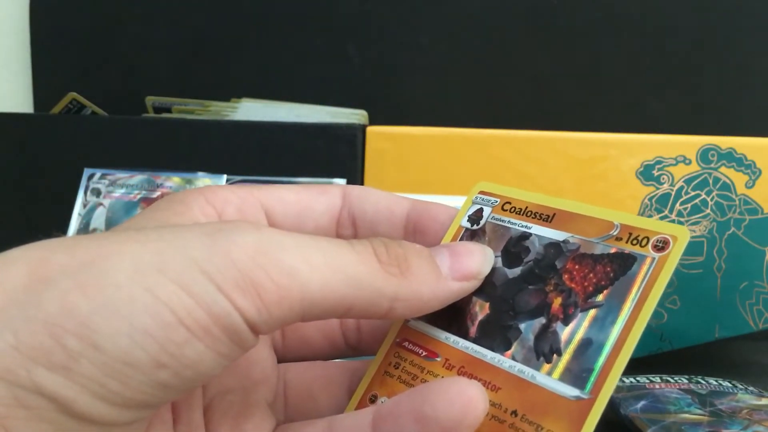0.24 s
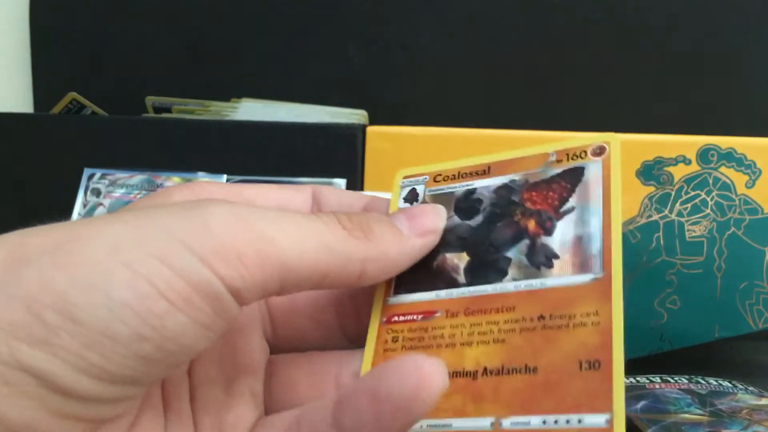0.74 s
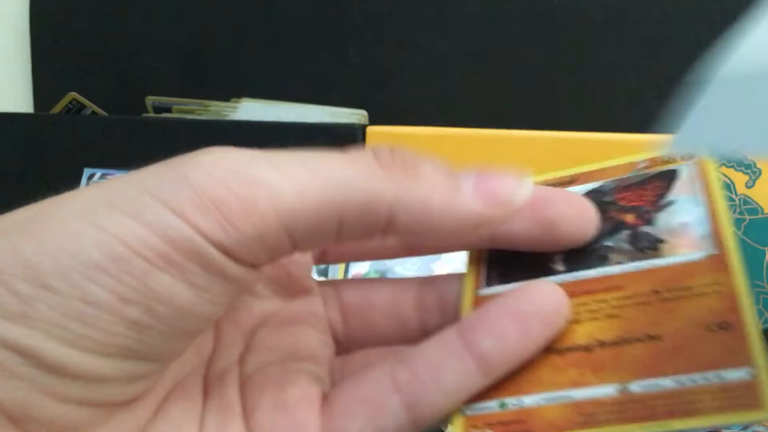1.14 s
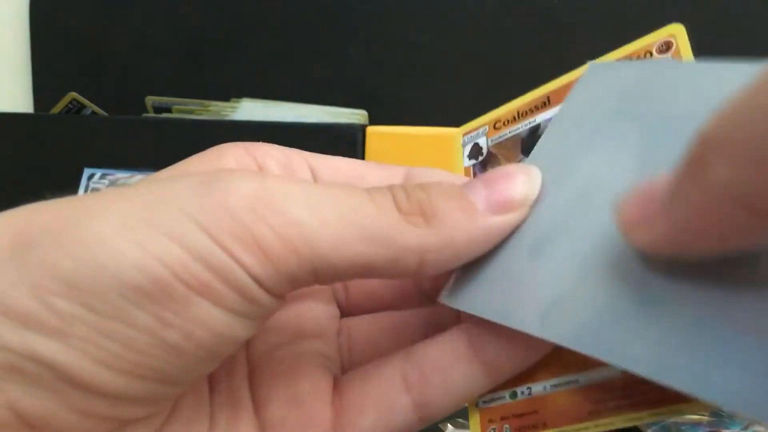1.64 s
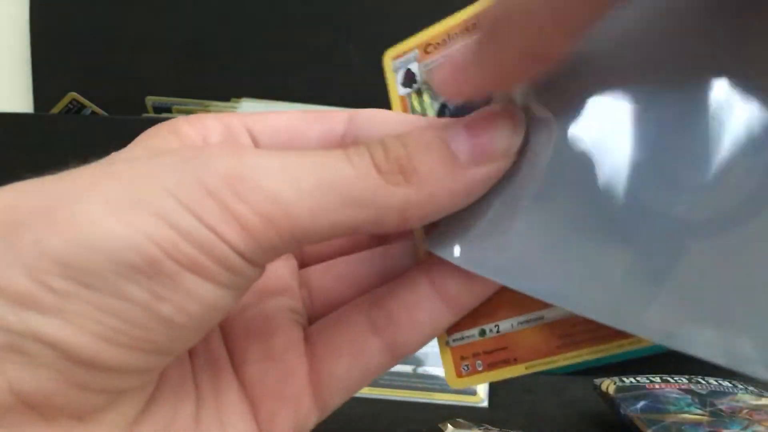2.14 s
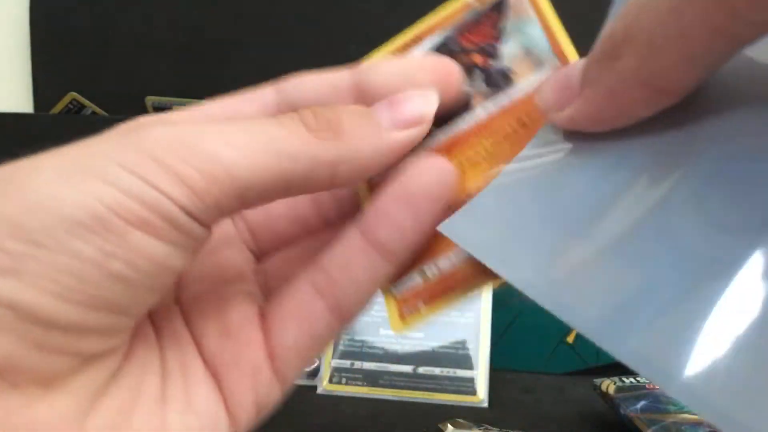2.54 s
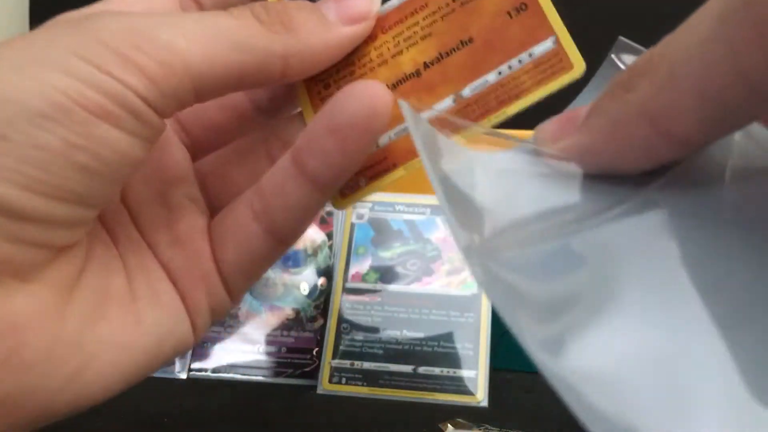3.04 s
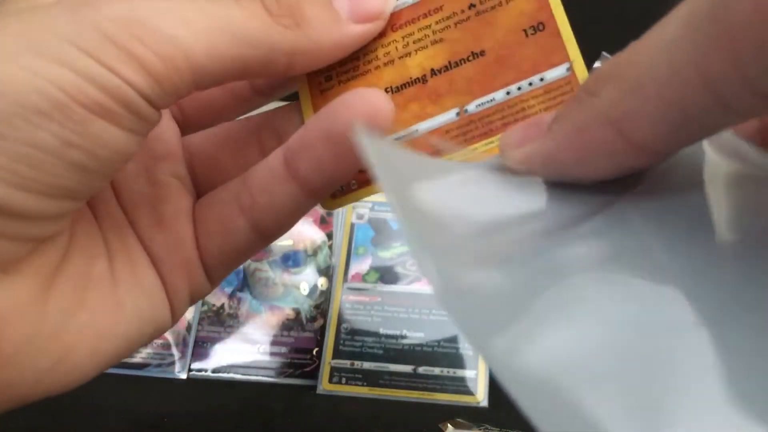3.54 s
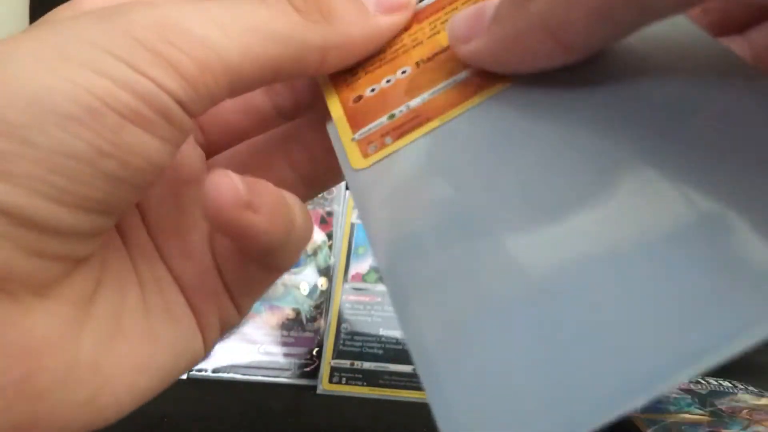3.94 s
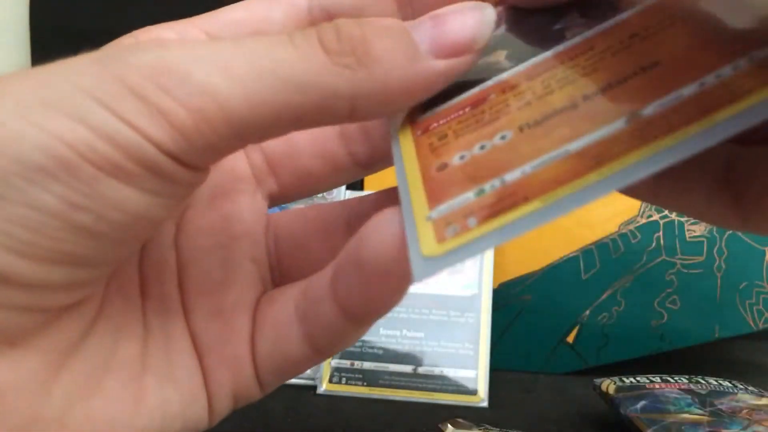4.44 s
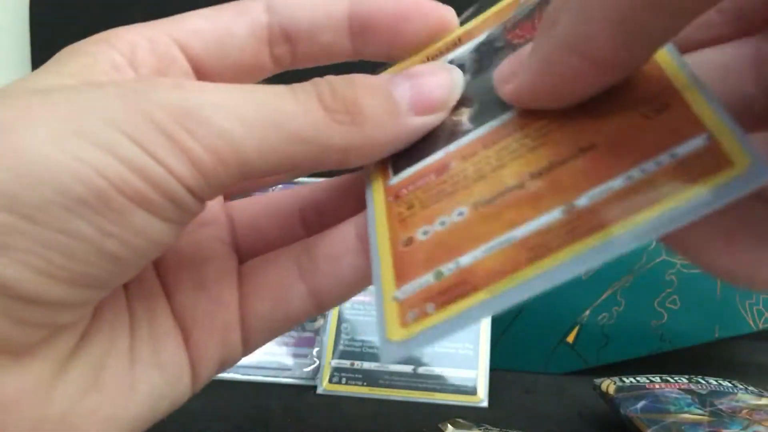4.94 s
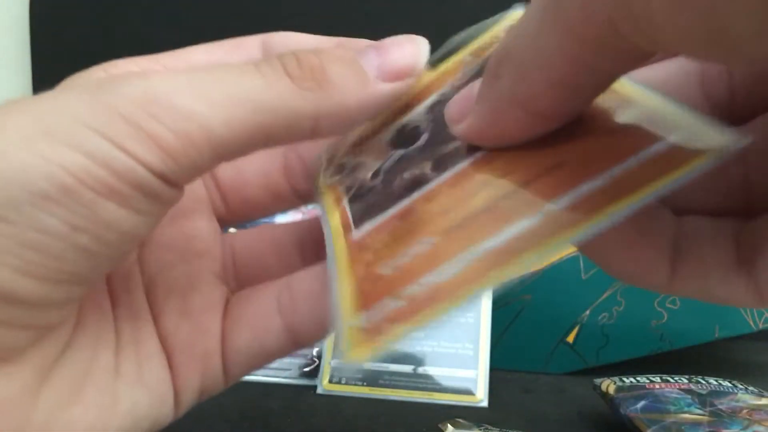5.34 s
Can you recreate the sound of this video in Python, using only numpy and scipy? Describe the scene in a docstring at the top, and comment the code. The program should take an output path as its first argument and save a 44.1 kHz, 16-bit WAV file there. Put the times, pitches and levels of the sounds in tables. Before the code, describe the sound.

Very close mono pickup in a quiet room: fingers rub a stiff card with quick dry rasps and clicks, then thin plastic film ticks and rustles. Two loud sharp snaps come just after two seconds, lighter crackles follow, the card hisses into the sleeve around four seconds, and scattered bright clicks end it. Low table rumble and faint hiss lie beneath.

```python
"""Close by, hands turn a card, open a plastic sleeve and slide the card in, above a table in a quiet room.
Early on, skin, card and film rub (friction noise into resonances), a fingertip whistles faintly on the gloss,
the buckling film snaps (noise bursts around sharp clicks), with card knocks and low thumps (decaying tones).
The sharpest snaps come a little past two seconds; near four the card hisses into the sleeve, then more snaps.
Throughout, the table hums low under the forearms (a wavering low mode) over a faint steady hiss."""
import sys
import numpy as np
from scipy import signal
from scipy.fft import rfft, irfft
from scipy.io import wavfile

SR = 44100
rng = np.random.default_rng(int(sys.argv[2]) if len(sys.argv) > 2 else 0)


def transcribe(u):
    """Save the signal u as a 16-bit wav file named by the first command-line argument.

    u: samples, shape (n,) or (channels, n), limited to [-1, 1]; the rate is SR.
    q: integer samples, one column per channel.
    """
    v = np.clip(np.atleast_2d(u).T, -1, 1)
    q = np.round(v * 32767).astype(np.int16)
    wavfile.write(sys.argv[1], SR, q)


N = 246519  # samples


def undb(db):
    """Decibel definition: level to amplitude ratio."""
    return 10 ** (np.asarray(db) / 20)


def unit(x):
    """Normalization to an RMS of 1."""
    return x / np.sqrt(np.mean(x ** 2))


def peak(x):
    """Normalization to a peak of 1."""
    return x / np.max(np.abs(x))


def band(x, hz, width_hz):
    """Simple resonance: two poles, gain 1 at the centre."""
    hz = np.clip(hz, 20, 18000)
    b, a = signal.iirpeak(hz, hz / np.clip(width_hz, 1, 18000), SR)
    return signal.lfilter(b, a, x)


def ring(x, modes):
    """Modal superposition: parallel resonances, neighbours opposite in sign."""
    return sum((-1) ** k * undb(db) * band(x, hz, width) for k, (hz, width, db) in enumerate(modes))


def curves(table):
    """Linear interpolation of each column over time."""
    s, *columns = np.transpose(table)
    return [np.interp(np.arange(N) / SR, s, c) for c in columns]


def walk(rate):
    """Slow random modulation: levels, rate a second, joined by straight lines; spread near 1."""
    levels = rng.standard_normal(1200)
    return 1.2 * np.interp(np.arange(N) * rate / SR, np.arange(len(levels)), levels)


def friction(scatter_db, patch_rate, patchy_db):
    """Stick-slip friction: dense slips of uneven size, stronger and weaker in patches."""
    slips = rng.standard_normal(N) * undb(scatter_db * rng.exponential(size=N))
    return slips * undb(patchy_db * walk(patch_rate))


def rasp(modes, scatter_db, drift_db, patchy_db=3.1):
    """Friction-driven modes: the contact wanders, so each mode swells and fades alone."""
    slips = friction(scatter_db, 80, patchy_db)
    total = np.zeros(N)
    for k, (hz, width, db) in enumerate(modes):
        tone = band(band(slips, hz, width), hz, 5.16 * width)
        total += (-1) ** k * undb(db + drift_db * walk(14)) * tone
    return unit(total)


# time constants of every stroke, and the level it gains as pressure builds
ATTACK_S, RELEASE_S, BUILD_DB_PER_S = 0.0053, 0.0074, 8


def stroke(s, length):
    """Exponential envelope: rises to 1 at the start, builds over the length and dies away."""
    knee_db = [-60, 0, BUILD_DB_PER_S * length, -60]
    # 60 dB take ln(1000) time constants
    knee_s = s + np.array([-np.log(1000) * ATTACK_S, 0, length, length + np.log(1000) * RELEASE_S])
    i, j = np.clip(knee_s[[0, -1]] * SR, 0, N).astype(int)
    gain = np.zeros(N)
    gain[i:j] = undb(np.interp(np.arange(i, j) / SR, knee_s, knee_db))
    return gain


def swells(table, resting_db):
    """Gaussian envelopes: smooth humps on top of a resting level."""
    t = np.arange(N) / SR
    humps = sum(undb(db) * np.exp(-(2 * (t - s) / length) ** 2) for s, length, db in table)
    return undb(resting_db) + humps


# spectrum of the room hiss before levelling: pitch_hz, density (dB per Hz, relative)
ROOM_SPECTRUM = [(150, -38), (250, 21), (500, 1), (684, 11.5), (1040, -15), (2080, -16), (6410, -12),
                 (15800, -2)]
ROOM_DB = -75  # RMS


def room():
    """Stationary noise: the steady faint hiss of room and microphone, shaped in frequency."""
    hz, db = np.transpose(ROOM_SPECTRUM)
    log_hz = np.log(np.arange(1, N // 2 + 2) * SR / N)
    spectrum = rfft(rng.standard_normal(N)) * undb(np.interp(log_hz, np.log(hz), db))
    return undb(ROOM_DB) * unit(irfft(spectrum, N))


# forearms lean on the table: centre_s, length_s, boom level_db
LEANS = [(1.04, 0.07, -49), (1.21, 0.089, -56), (1.92, 0.11, -56.5), (2.15, 0.076, -60.5),
         (2.41, 0.026, -52), (2.68, 0.15, -66), (2.92, 0.13, -60.5), (4.48, 0.17, -49.5), (4.68, 0.2, -63)]
# arms knock or shift on it: centre_s, length_s, shuffle level_db
SHIFTS = [(0.16, 0.044, -55), (0.31, 0.035, -56), (0.425, 0.043, -50), (0.605, 0.006, -46.5),
          (0.89, 0.032, -45.5), (1.0, 0.2, -51), (1.135, 0.023, -39), (1.79, 0.031, -53),
          (2.145, 0.027, -55), (2.925, 0.037, -55), (3.18, 0.017, -54), (3.55, 0.03, -60),
          (4.022, 0.012, -52)]
# fidgeting between the events; card and film levels are relative, weighted in rubbing():
# start_s, card level_db, film level_db, arms on the table level_db
FIDGET = [(0.0, -57, -96, -57.5), (0.13, -59, -81, -71), (0.55, -57.5, -67.5, -57), (1.1, -71, -66, -77),
          (1.27, -67, -74, -61), (1.4, -62, -68.5, -61.5), (2.1, -60.5, -61, -65.5),
          (2.23, -62.5, -74.5, -66.5), (2.6, -64, -72.5, -65), (3.0, -63, -73, -65),
          (3.6, -61.5, -74, -66.5), (3.75, -63.5, -65, -68), (4.5, -70.5, -84, -66), (4.7, -69, -75, -65),
          (5.25, -67.5, -78, -63), (5.59, -66, -66, -66)]
TABLE_HZ, TABLE_WANDER_HZ = 60.8, 14.2 / 4
FIDGET_BOOM_DB = -4.5  # resting boom over the shuffle
PATCHY_DB = 2.5  # unevenness of the shuffle


def table():
    """Plate modes: the lowest booms almost as a tone; arms shuffling on the top rumble above it."""
    arms_db = curves(FIDGET)[-1]
    wavering_hz = TABLE_HZ + TABLE_WANDER_HZ * walk(8)
    tone = np.sqrt(2) * np.sin(2 * np.pi * np.cumsum(wavering_hz) / SR)
    boom = tone * undb(2.8 * walk(9))
    shuffle = ring(friction(1.0, 25, PATCHY_DB), [(80, 40.5, 1.5), (143.6, 56, 1.0), (224.0, 164, -6.0)])
    shuffle = ring(shuffle, [(113, 210, 0)])
    under = band(band(rng.standard_normal(N), 47, 21), 54, 37)
    booming = swells(LEANS, arms_db + FIDGET_BOOM_DB) * boom
    shuffling = swells(SHIFTS, arms_db) * unit(shuffle)
    return booming + shuffling + undb(-74.0) * unit(under)


SETTLE_DB, SETTLE_S = -41, 0.014  # start of the rustle against the snap's peak, before weighting; time constant


def settling():
    """Exponential relaxation: after every snap the film rustles back into shape."""
    kicks = np.zeros(N)
    for s, db, *_ in SNAPS:
        kicks[int(s * SR)] = undb(db + SETTLE_DB)
    return signal.lfilter([1], [1, -np.exp(-1 / (SETTLE_S * SR))], kicks)


def creases(per_second, size_db, fade_ms):
    """Random impulses: gain jumps when a small crease gives way and fades within milliseconds."""
    kicks = (rng.random(N) < per_second / SR) * undb(size_db * rng.standard_normal(N))
    return signal.lfilter([1], [1, -np.exp(-1000 / (fade_ms * SR))], kicks)


# rubs of fingers, card and film; levels are relative, weighted in rubbing():
# start_s, length_s, card rasp level_db, fine-grain treble level_db, soft low scrape level_db
STROKES = [(0.01, 0.092, -52.5, -68.5, -68.5), (0.172, 0.023, -47, -64, -88), (0.225, 0.05, -68, -61, -89),
           (0.26, 0.026, -44, -51.5, -67), (0.3, 0.04, -38.5, -51, -73), (0.348, 0.014, -38, -43.5, -70),
           (0.378, 0.022, -33.5, -45, -75), (0.412, 0.015, -78, -91, -58), (0.545, 0.12, -74, -65.5, -90),
           (0.773, 0.059, -60, -78, -99), (0.858, 0.042, -44.5, -78, -53), (0.919, 0.085, -51, -65, -51),
           (1.016, 0.041, -51, -78, -48.5), (1.079, 0.054, -54, -64, -43.5), (1.123, 0.053, -61, -78, -56),
           (1.191, 0.015, -53, -63.5, -50), (1.323, 0.077, -63, -69, -61), (1.483, 0.03, -66, -60, -95),
           (1.643, 0.09, -56, -101, -57.5), (1.75, 0.037, -61, -64.5, -68), (1.935, 0.024, -57, -61, -50),
           (2.077, 0.09, -58, -64.5, -55), (2.333, 0.039, -65, -57, -91), (2.378, 0.041, -60, -99, -60),
           (2.432, 0.11, -61.5, -69, -93), (2.527, 0.09, -62.5, -64, -69), (2.646, 0.041, -58, -61, -67),
           (2.743, 0.0097, -57, -68, -54), (2.789, 0.054, -58, -63, -63.5),
           (3.132, 0.069, -55.5, -64.5, -60.5), (3.29, 0.012, -50.5, -70, -60.5),
           (3.339, 0.049, -65, -70.5, -53.5), (3.46, 0.011, -43, -87, -54),
           (3.537, 0.066, -57.5, -56, -62.5), (3.613, 0.038, -51.5, -62, -49),
           (4.608, 0.096, -67, -63, -67), (4.731, 0.1, -106, -69, -101), (4.862, 0.0062, -74, -52, -49.5),
           (4.965, 0.057, -100, -59.5, -62.5), (5.11, 0.0083, -103, -55.5, -56.5),
           (5.336, 0.036, -55, -55, -52.5), (5.533, 0.027, -114, -70, -72)]
SWISH_SHARE, SWISH_DB = 0.62, -4  # the sleeve's swish lies between rasp and treble; its offset
FIDGET_LOW_DB = 0.5  # low scrape over the card


def mix(rasp_db, treble_db, low_db):
    """Level interpolation: gains of rasp, swish, treble and low scrape."""
    swish_db = rasp_db + SWISH_SHARE * (treble_db - rasp_db) + SWISH_DB
    return undb([rasp_db, swish_db, treble_db, low_db])


def contact():
    """Sum of contact gains: fidgeting, strokes and settling film."""
    card_db, film_db, _ = curves(FIDGET)
    fidgeting = mix(card_db, film_db, card_db + FIDGET_LOW_DB)
    strokes = sum(mix(*levels)[:, None] * stroke(s, length) for s, length, *levels in STROKES)
    return fidgeting + strokes + mix(0, -6.5, 0.37)[:, None] * settling()


# resonances of the card's rasp: pitch_hz, width_hz, level_db
CARD_BODY = [(1633, 270, -2), (2024, 210, 3.5), (2490, 1000, -3)]
# resonances of the soft low scrape: pitch_hz, width_hz, level_db
CARD_HOLLOW = [(350, 150, -1), (684, 75, 3.5), (860, 300, -6), (1200, 500, -4.5)]
# resonances of the sleeve's swish: pitch_hz, width_hz, level_db
FILM_EDGE = [(3100, 380, -0.23), (4030, 1720, 0.69)]
# resonances of the fine-grain treble: pitch_hz, width_hz, level_db
FILM_SHEEN = [(5980, 1920, 1.5), (10050, 1660, 2.5), (13300, 3600, -5.5)]
DRIFT_DB = 2.2  # how far each card mode swells and fades


def rubbing():
    """Stick-slip friction: four contacts slip on their own, grip trembling; creases crinkle mostly the card."""
    body, edge, sheen, hollow = contact()
    card = body * rasp(CARD_BODY, 1.3, DRIFT_DB) + hollow * rasp(CARD_HOLLOW, 3.07, DRIFT_DB)
    film = edge * rasp(FILM_EDGE, 2.18, 1.4) + sheen * rasp(FILM_SHEEN, 2.4, 3.2, patchy_db=1.1)
    crinkle = creases(140.0, 2.7, 0.67)
    grip = undb(0.82 * walk(40))
    return grip * (undb(-8.5) * (1 + 0.59 * crinkle) * card + (1 + 0.2 * crinkle) * film)


# a fingertip drags on the gloss with a thin whistle: start_s, length_s, pitch_hz, level_db
DRAGS = [(0.024, 0.113, 2610, -69.5), (2.44, 0.044, 3070, -59.5)]


def drags():
    """Selective resonance: friction through one narrow mode."""
    out = np.zeros(N)
    for s, length, hz, db in DRAGS:
        out += undb(db) * stroke(s, length) * rasp([(hz, hz / 12, 0)], 0.81, 1.2)
    return out


# card knocks and low thumps: start_s, peak level_db, pitch_hz, t60_ms
KNOCKS = [(0.262, -19.5, 2140, 4.2), (0.4165, -49, 590, 27), (0.688, -43.5, 1110, 21),
          (0.877, -37, 170, 30), (1.1253, -24, 1157, 19), (1.1239, -33.5, 1640, 28)]
KNOCK_RISE_MS = 0.26  # time constant


def knocks():
    """Exponential decay: card knocks and low thumps as short tones with a soft onset."""
    out, t = np.zeros(N), np.arange(3000) / SR
    for s, db, hz, t60_ms in KNOCKS:
        shape = (1 - np.exp(-1000 * t / KNOCK_RISE_MS)) * undb(-60000 * t / t60_ms)
        out[int(s * SR):][:len(t)] += undb(db) * peak(shape) * np.sin(2 * np.pi * hz * t)
    return out


# speed of the card going into the sleeve, as level of its hiss: time_s, level_db
SLIDE = [(3.86, -92), (3.91, -62.5), (3.97, -49.5), (4.05, -54), (4.372, -54.5), (4.386, -78)]
# resonances of the sleeve filling with card: pitch_hz, width_hz, level_db
POCKET = [(2900, 1500, -5), (4150, 520, 3), (6540, 1700, -3.5), (9160, 1000, 2), (12300, 4500, -3)]


def slide():
    """Sliding friction: the card, guided by the film, hisses finely; the hiss grows, holds, stops at the bottom."""
    return undb(curves(SLIDE)[0]) * rasp(POCKET, 1.2, 1.5, patchy_db=0.8)


# film and card edge snapping; the last levels are relative to the pop:
# start_s, peak level_db, pitch_hz, bright crack level_db, low flap level_db, burst length_ms
SNAPS = [(0.1827, -37, 2240.0, -12, -11, 3.9), (0.257, -28, 8500, -26, -31, 4.5),
         (0.2666, -29, 2000, -15, -28, 4.2), (0.275, -26, 6500, 4, -31, 1.7),
         (0.29, -28.5, 1730, -4, -13.5, 0.44), (0.3014, -19.5, 3370, -2.5, -38, 0.85),
         (0.31, -26, 4220, -13, -31, 1.3), (0.379, -21, 9050, -34, -34, 3.9),
         (0.4098, -26, 2370, 6, -4, 1.6), (0.42, -38, 570, -27, -7.5, 29),
         (0.6844, -35, 6600, -18, -22, 8.8), (0.6885, -40, 1160, -21, -15, 3.4),
         (0.8731, -27, 3060, -1.5, -11, 0.52), (0.8811, -35, 2980, -31, 2.5, 0.89),
         (0.887, -33.5, 990, -32, -1, 1.4), (0.9242, -33.5, 1410, -27, -7.5, 0.36),
         (1.01, -40, 850, 0, 2, 0.96), (1.0362, -41.5, 1300, -22, 0.5, 1.3),
         (1.106, -28.5, 3950, -6, -13, 0.3), (1.124, -20.5, 5400, 9, -9.5, 4.1),
         (1.1915, -31, 2650, 2.5, -9, 0.36), (1.192, -40.5, 680, -25, -19, 3.8),
         (1.522, -41.5, 1050, -20, -1.5, 8), (1.659, -42, 3500, -26, -24, 1.5),
         (1.781, -25, 2110, -5, -9, 2.9), (1.7885, -32, 676, -19, -29, 4.1),
         (1.8775, -36.5, 3540, -10, -6, 1.2), (1.908, -49.5, 900, -20, 6, 1.5),
         (1.941, -40, 1640, -17, 4, 1.1), (2.13, -33, 1430, -21, -7, 0.34),
         (2.14, -27.5, 3200, -3, -17, 0.86), (2.1514, -4.5, 3860, -29, -30, 1.7),
         (2.1528, -27.5, 5800, -10, -8.5, 1.2), (2.275, -10, 3510, -8, -32.5, 1.64),
         (2.389, -47, 1210, 1, 3, 1.4), (2.5288, -41, 1890, -6, -6, 1.2), (2.562, -41, 5700, -9, -11, 5.3),
         (2.682, -37, 4600, -23, -18, 15), (2.748, -44, 2180, -26, -20, 10),
         (2.8289, -25.5, 4000, -42, -18, 7.1), (2.832, -28.5, 1970, -42, -17, 4.7),
         (2.9176, -29.5, 1860, -42, -8.5, 4.6), (2.922, -32.5, 850, -37, -2, 0.65),
         (2.9591, -31, 2360, -38, -9.5, 3.4), (3.1814, -29.5, 3120, 1, -22, 0.74),
         (3.176, -41.5, 2000, 7, -2.5, 5.4), (3.1965, -31, 2600, -36, -26, 0.76),
         (3.201, -32.5, 2810, -17, -16, 0.92), (3.2248, -17, 3200, -20, -23, 0.44),
         (3.229, -36.5, 1690, -28, -13.5, 6), (3.28, -40, 8300, 11, -31, 3.8),
         (3.3353, -35.5, 1740, -33, -9, 0.88), (3.447, -37, 3350, -4, -18, 0.82),
         (3.4531, -25, 3600, 0, -28, 0.6), (3.4548, -27, 3860, -3, -23, 0.71),
         (3.4565, -26, 4000, -4, -44, 0.5), (3.4603, -19, 3900, 1, -44, 1),
         (3.4686, -23.5, 3600, -10, -23, 1.1), (3.474, -27, 3030, -12, -34, 0.96),
         (3.5342, -34.5, 2630, 1, -17, 4), (3.5377, -24.5, 2500, -28, -16, 1.2),
         (3.545, -29.5, 3640, -13, -20, 0.58), (3.5509, -28, 4000, -14, -22, 0.62),
         (4.0172, -48, 905, -30, 10.5, 0.31), (4.063, -29, 8700, -22, -24, 0.81),
         (4.3763, -27, 12000, -36, -25.5, 0.55), (4.4438, -43.5, 2500, 7.5, -5.5, 1.9),
         (4.584, -47, 3000, 11, -6, 2.8), (4.606, -53, 2580, -12, -26, 1.0),
         (4.7319, -22.5, 6250, -33, -29, 0.34), (4.737, -22.5, 5100, -34, -20, 0.22),
         (4.7429, -21, 10400, -9, -20.5, 2.2), (4.831, -29, 9800, -43, -22.5, 0.14),
         (4.8671, -44, 1750, -4.5, -21, 15), (5.104, -39.5, 7900, 11, -13, 1.4),
         (5.1175, -30.5, 8100, -38.5, -25, 1.8), (5.1926, -35, 6600, -9, -17, 0.76),
         (5.336, -40, 2540, 5.5, -10, 1), (5.3681, -29, 1430, -2, -19, 0.63), (5.434, -42, 5040, 0, -21, 4),
         (5.4375, -14.5, 4120, 4, -25.5, 3.3), (5.441, -23, 4050, -22, -24, 0.74),
         (5.555, -34, 9200, -42, -29, 14)]
# fixed treble resonances colouring every snap, perhaps the microphone's: pitch_hz, width_hz, level_db
TREBLE_COLOUR = [(6050, 1100, 0), (9000, 1500, -2), (14800, 2000, -9)]
CLICK_SIZE = 8  # the sharp click against the noise around it
TAIL_DB, TAIL_MS = -18, 2.1  # scattered hiss: relative peak, time constant


def snaps():
    """Impulse excitation: a short noise burst around a sharp click, then a low flap and a short scattered hiss."""
    lead, size = 200, 1800  # samples before the click, and in all
    out, t = np.zeros(N + size), (np.arange(size) - lead) / SR
    after = np.maximum(t, 0)
    chance = rng.standard_normal((len(SNAPS), 3, size))
    for (s, db, hz, crack_db, flap_db, ms), (noise, flap, tail) in zip(SNAPS, chance):
        span = max(ms, .1) / 1000
        rise_and_fall = np.exp(np.minimum(t / (.15 * span), -t / (.65 * span)))
        burst = (noise + CLICK_SIZE * (t == 0)) * rise_and_fall
        # a broad click with the buckled panel's own ring on top
        click = burst
        for _ in range(3):
            click = band(click, hz, 1.86 * hz)
        pop = peak(undb(-4) * click + band(click, hz, 0.45 * hz))
        crack = peak(ring(burst, TREBLE_COLOUR))
        low = peak(band(band(flap * after * np.exp(-after / 0.0011), 130, 560), 160, 802))
        hiss = tail * np.exp(-after / TAIL_MS * 1000) * (1 - np.exp(-after / 0.001))
        dull_hiss = band(band(hiss, hz, 2.2 * hz), hz, 2.6 * hz)
        hiss = peak(dull_hiss + undb(crack_db) * ring(hiss, TREBLE_COLOUR))
        snap = peak(pop + undb(crack_db) * crack) + undb(flap_db) * low + undb(TAIL_DB) * hiss
        i = int(s * SR) - lead
        out[i:i + size] += undb(db) * snap
    return out[:N]


def scene():
    """Linear superposition of all sources, in one channel."""
    return (snaps() + knocks() + rubbing() + slide() + drags() + table() + room())[None]


# the phone's case cancels narrow bands: pitch_hz, width_hz, share removed (amplitude ratio)
CASE_DIPS = [(4950, 500, 0.55), (10400, 1200, 0.4)]
TOP_HZ = 15850


def record(dry):
    """Cancellation and low-pass filtering: the case notches the treble; nothing sounds above about 16 kHz."""
    for hz, width_hz, share in CASE_DIPS:
        dry = dry - np.clip(share, 0, 1) * band(dry, hz, width_hz)
    return signal.sosfilt(signal.ellip(8, .2, 60, TOP_HZ, fs=SR, output="sos"), dry)


dry = scene()
out = record(dry)
transcribe(out)
```